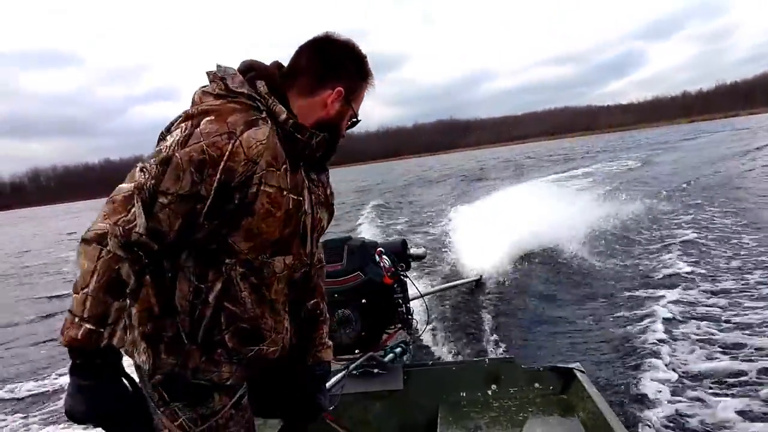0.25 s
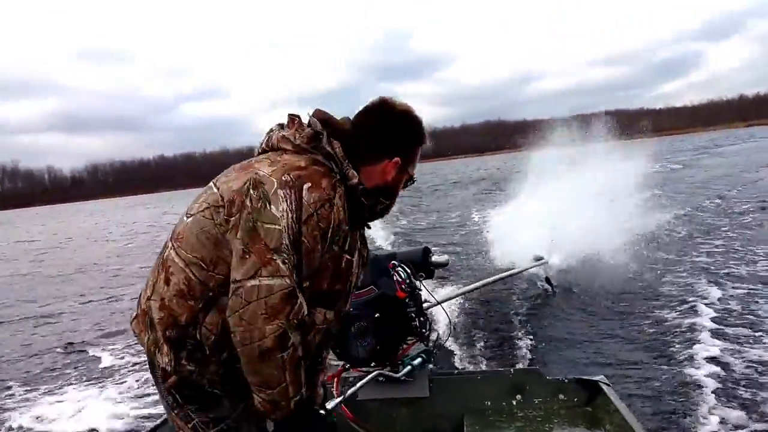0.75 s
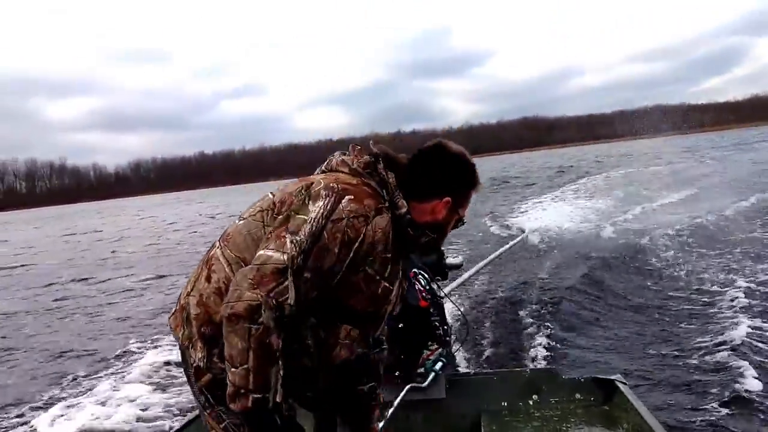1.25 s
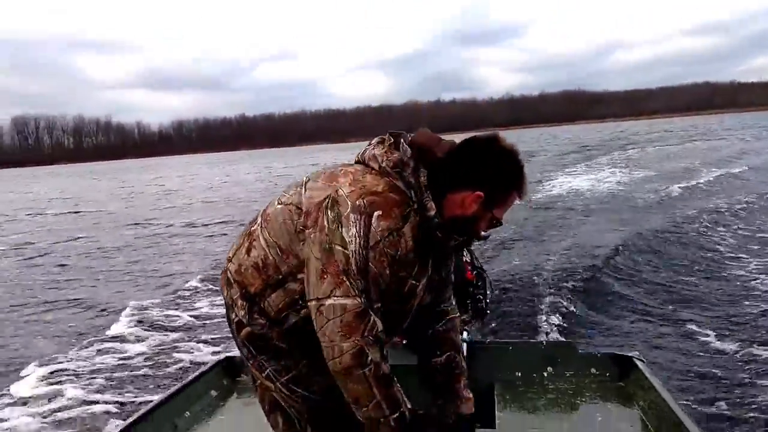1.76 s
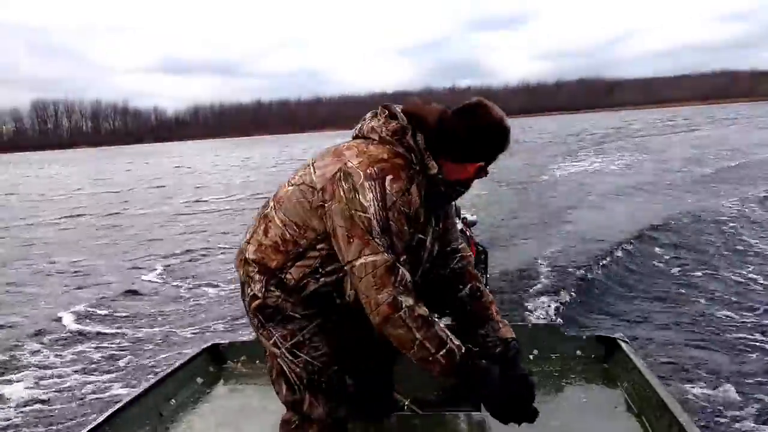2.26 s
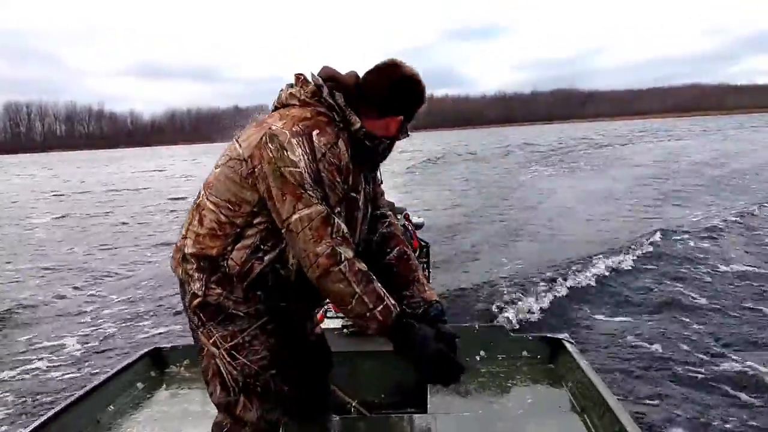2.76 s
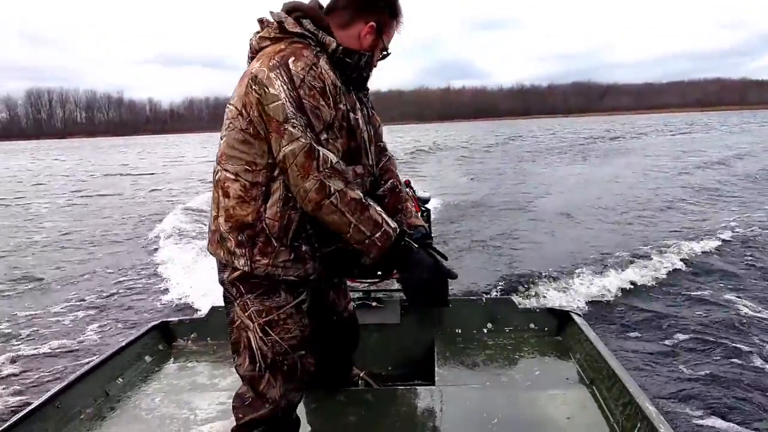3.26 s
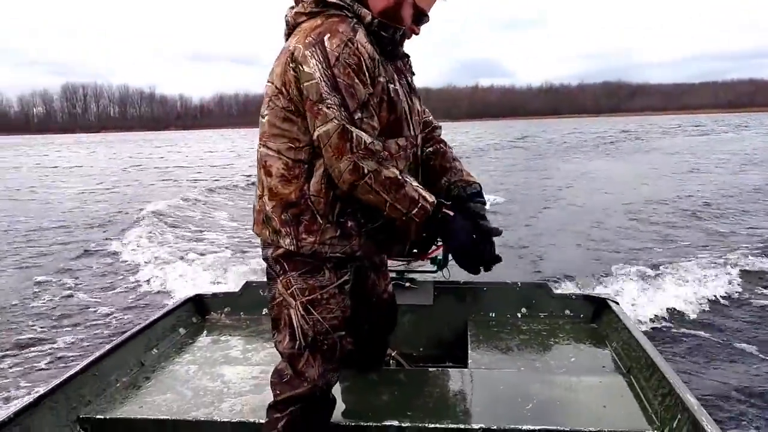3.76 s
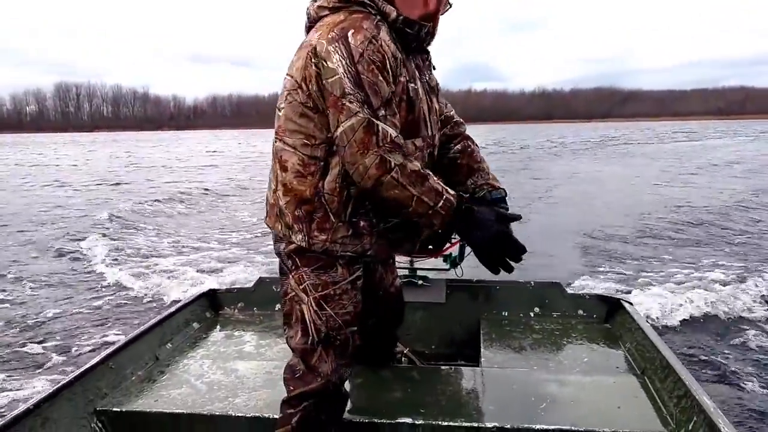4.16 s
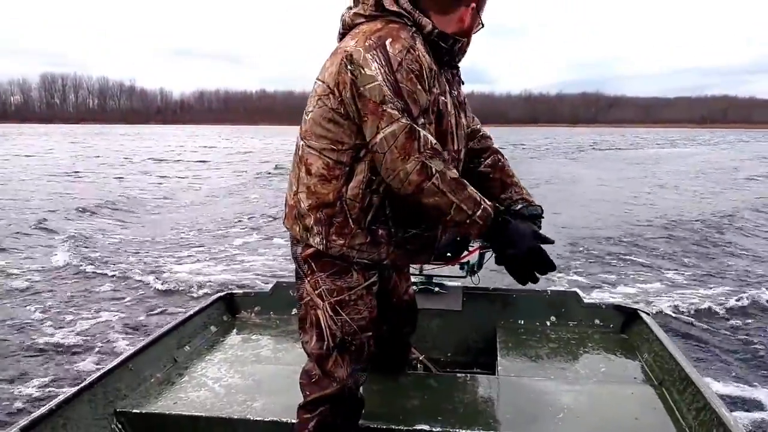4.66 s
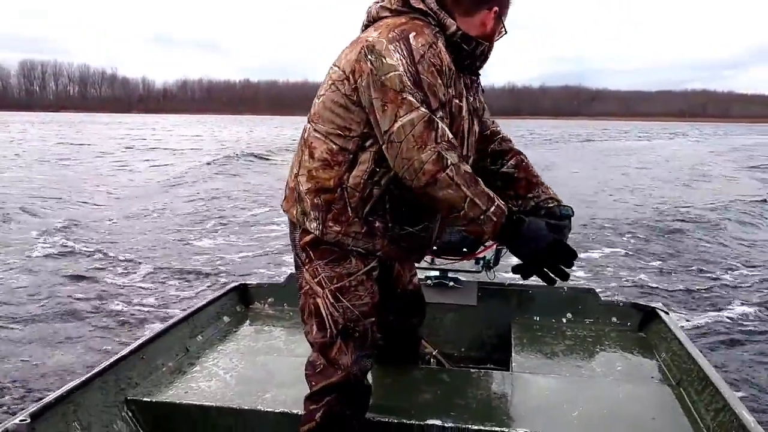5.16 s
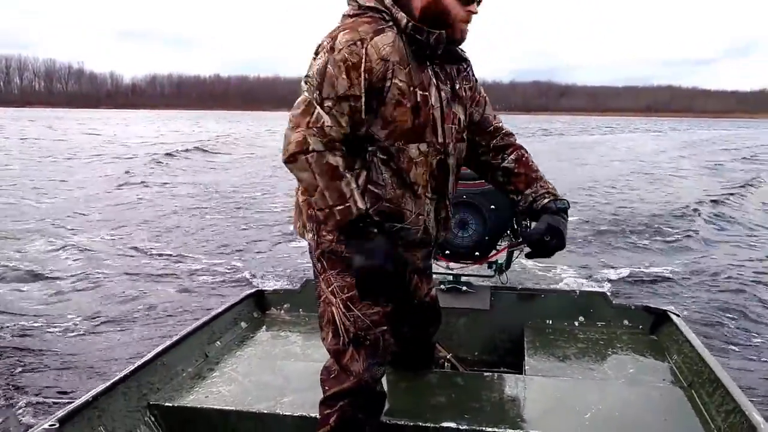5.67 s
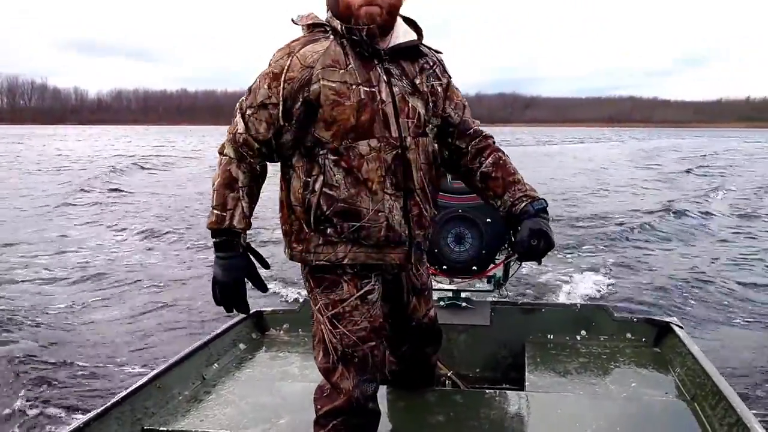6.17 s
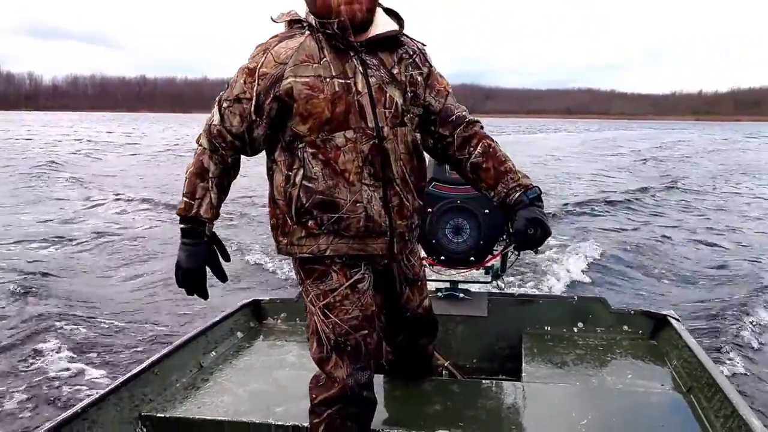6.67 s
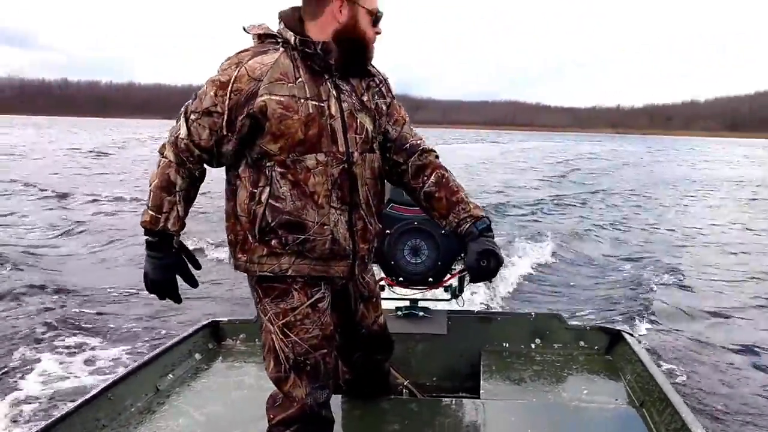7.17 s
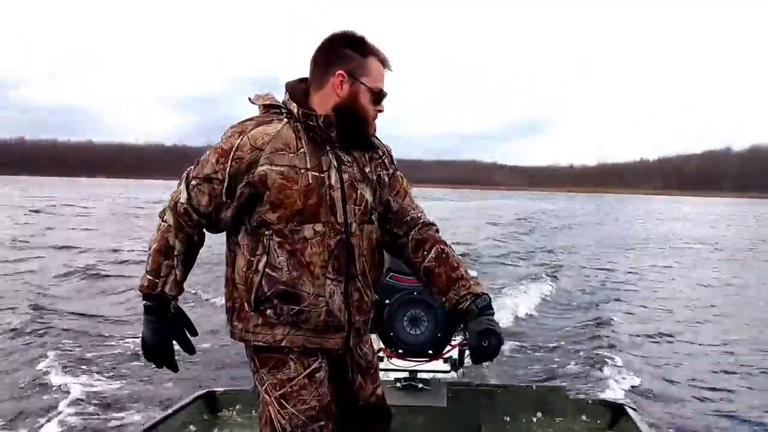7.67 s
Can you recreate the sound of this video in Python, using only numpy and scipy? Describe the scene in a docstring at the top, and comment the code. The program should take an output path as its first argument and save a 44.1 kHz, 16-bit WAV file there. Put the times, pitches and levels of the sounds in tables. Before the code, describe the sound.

A small single-cylinder boat motor roars across a lake, spins free, drops to a knocking idle amid gurgling water and wind, then picks up droning.

```python
"""A flat metal boat crosses a lake, driven by a single-cylinder, air-cooled four-stroke long-tail motor.
Under load it hums and roars over wash and waves, until the propeller lifts clear and the engine spins free.
It is throttled down to a knocking idle with gurgling water, then picks up again: fan rush and drone come forward.
Tones and kicks locked to the engine cycle make the motor; filtered noise makes gas, metal, air and water.
Gusts buffet a closely spaced, electronically widened pair of microphones."""
import sys
import numpy as np
from scipy import signal
from scipy.fft import rfft, irfft, next_fast_len
from scipy.io import wavfile
from scipy.ndimage import uniform_filter1d, map_coordinates

SR = 44100
rng = np.random.default_rng(int(sys.argv[2]) if len(sys.argv) > 2 else 0)


def persist_wave(psi):
    """Save psi, clipped to +-1, as 16-bit WAV."""
    counts = np.round(np.clip(psi, -1, 1) * 32767).astype(np.int16)
    wavfile.write(sys.argv[1], SR, np.atleast_2d(counts).T)


N = 349272
TIME = np.arange(N) / SR  # s


def from_db(db):
    """Decibels to gain."""
    return 10 ** (np.asarray(db) / 20)


def rms_one(x):
    """Scale to rms 1."""
    return x / np.sqrt(np.mean(x ** 2) + 1e-20)


def in_time(rows):
    """Read each column of a curve table at every sample; the first column is the time in seconds."""
    seconds, *columns = np.transpose(rows)
    return [np.interp(TIME, seconds, column) for column in columns]


def at_hz(points, hz):
    """Read a table on a log-frequency axis."""
    table_hz, value = np.transpose(points)
    return np.interp(np.log(hz + 1e-6), np.log(table_hz), value)


def drift(rate):
    """Smooth chance with spread 1 that changes about rate times a second."""
    step = 40  # samples between the slow random values
    r = np.exp(-2 * np.pi * step * rate / SR)
    noise = rng.standard_normal(N // step + 2002)
    slow = signal.lfilter([1], [1, -2 * r, r * r], noise)[2000:]  # skip the filter's build-up
    return np.interp(np.arange(N) / step, np.arange(len(slow)), rms_one(slow))


def spectrum_of(x):
    """Padded transform and its frequencies."""
    size = 2 * next_fast_len(N // 2 + 2000)
    return rfft(x, size), np.arange(size // 2 + 1) * SR / size


def coloured(x, spectrum):
    """Pass x through a body with this response, keeping the power of white noise."""
    bins, hz = spectrum_of(x)
    response = rms_one(from_db(at_hz(spectrum, hz)))
    return irfft(bins * response)[..., :N]


def hiss():
    """White noise, unrelated in the two channels."""
    return rng.standard_normal((2, N))


def grains(per_s, spread_db):
    """Random tiny impacts of uneven size and either sign, scaled to rms 1."""
    size_db = spread_db * np.minimum(rng.exponential(1, (2, N)), 4)
    sizes = from_db(size_db) * rng.choice([-1, 1], (2, N))
    return rms_one(sizes * (rng.random((2, N)) < per_s / SR))


def ring(x, hz, t60):
    """One decaying mode that keeps the power of white noise; t60 is its time to fall 60 dB, in seconds."""
    r = from_db(-60 / (t60 * SR))
    w = 2 * np.pi * hz / SR
    gain = np.sin(w) * np.sqrt(2 * (1 - r * r))
    return signal.lfilter([0, gain], [1, -2 * r * np.cos(w), r * r], x + 1e-18)


def wavering(hz, rate):
    """A narrow band of noise round a moving pitch; it flutters about rate times a second."""
    angle = 2 * np.pi * np.cumsum(hz) / SR
    return drift(rate) * np.cos(angle) + drift(rate) * np.sin(angle)


def orders(cycle, table, waver_db):
    """Tones locked to the engine cycle, each wavering a little in strength."""
    out = np.zeros(N)
    for multiple, level_db in table:
        turn = (round(multiple) * cycle + rng.random()) % 1
        gain = from_db(level_db + waver_db * drift(4.5))
        out += gain * np.sin((2 * np.pi * turn).astype(np.float32))
    return np.sqrt(2) * out


def strokes(cycle, decay_s, uneven_db, jitter):
    """Every contact of every engine cycle gives a kick that dies away; the running mean power is held near 1."""
    # Contacts in each engine cycle, two hard and two light.
    # Each row: share of the cycle, relative level in dB.
    contacts = [(.16, 0), (.43, -6), (.63, 0), (.9, -12)]
    kicks = np.zeros(N)
    cycles = np.arange(int(cycle[-1]))
    for share, level_db in contacts:
        slip, size = rng.standard_normal((len(cycles), 2)).T
        at = np.searchsorted(cycle, cycles + share + jitter * slip)
        kicks[np.minimum(at, N - 1)] = from_db(level_db + uneven_db * np.clip(size, -2, 2))
    r = np.exp(-1 / (decay_s * SR))
    swell = signal.lfilter([1], [1, -2 * r, r * r], kicks + 1e-18)
    return swell / np.sqrt(uniform_filter1d(swell ** 2, size=SR // 4) + 1e-9)


def engine_tones(cycle, firing_rate, load_db):
    """The block hums and the muffler drones; the hull booms under load, the shaft whines when fast and free."""
    # Hum of the block. Each row: time in seconds, dB for the tones round 4 x the firing rate
    # before their own balance, dB at 6 x.
    hum_curve = [(0, -32.5, -30.5), (.92, -38, -30), (1.05, -38, -51), (1.8, -38, -44), (2.28, -28.5, -41),
                 (2.6, -31.5, -43), (3.3, -41, -40), (5.2, -43, -36.5), (6.4, -32.5, -38.5),
                 (7.05, -32.5, -43), (7.35, -47, -48)]
    # The muffler's drone grows as the motor is swung round.
    # Each row: time in seconds, dB added to all the muffler tones.
    drone_curve = [(0, -61), (3.5, -59), (6.0, -42.5), (6.75, -40.5), (7.1, -35), (7.75, -35), (7.92, -38)]
    # Muffler note. Each row: multiple of the firing rate, relative level in dB.
    drone_orders = [(3, -2.5), (5, -5), (6, -4.5), (7, -5), (8, -6), (10, 1.5), (11, -4.5), (14, -6),
                    (16, -5), (33, -7), (36, -8)]
    # Orders that the hull radiates. Each row: multiple of the firing rate, relative level in dB.
    boom_orders = [(23, -7), (27, -10)]
    # The shaft whines at harmonics of twice the crank rate.
    # Each row: multiple of the firing rate, relative level in dB.
    whine_orders = [(8, 1.5), (12, -3), (16, -3.5), (20, -4), (24, -2), (28, -3), (32, 0), (36, 1.5),
                    (40, 1), (44, -4.5), (48, -2), (52, 0), (56, 2), (60, -3.5)]
    boom_full_load_db, boom_follows = -36.5, 1.7  # dB added to its orders; dB per dB of load
    whine_full_load_db, whine_damped = -49.5, 0.53  # dB added at speed; dB lost per dB of load
    whine_rate, whine_db_per_rate = 23.1, 7.0  # below this firing rate it fades, dB per firing per s

    fourth_db, sixth_db = in_time(hum_curve)
    drone_db, = in_time(drone_curve)
    too_slow = np.maximum(whine_rate - firing_rate, 0)
    whine_db = whine_full_load_db - whine_db_per_rate * too_slow - whine_damped * load_db
    boom_db = boom_full_load_db + boom_follows * load_db
    hum = from_db(fourth_db) * orders(cycle, [(3, -10.0), (4, 2.0), (5, -6.5)], waver_db=3.0)
    hum += from_db(sixth_db) * orders(cycle, [(6, 0)], waver_db=3.5)
    drone = from_db(drone_db) * orders(cycle, drone_orders, waver_db=2.2)
    boom = from_db(boom_db) * orders(cycle, boom_orders, waver_db=4.0)
    whine = from_db(whine_db) * orders(cycle, whine_orders, waver_db=1.1)
    return hum + drone + boom + whine


def exhaust(cycle, gain):
    """A puff of turbulent gas on each stroke, over a steady rush."""
    # Colour of the gas. Each row: frequency in Hz, relative level in dB per Hz.
    roar_spectrum = [(120, -24), (220, -10), (310, -3.5), (420, -8), (560, 0), (750, -4.5), (1000, -7.5),
                     (1450, -6), (2000, -10.5), (2700, -13.5), (4000, -16), (8000, -55), (15000, -48)]
    puffs = strokes(cycle, decay_s=.003, uneven_db=2.0, jitter=.008)
    rush = 0.62 * hiss()
    puffing = 0.4 * puffs * grains(6000, spread_db=2.0)
    return gain * coloured(rush + puffing, roar_spectrum)


def metalwork(cycle, gain, pickup):
    """Valve gear and sheet metal rattle at each contact, the shaft knocks; blows stir the metal's ringing modes."""
    # The drive shaft knocks in its mount. Each row: start in seconds, level in dB.
    knock_times = [(1.89, -18), (2.3566, -24), (2.463, -16), (2.5337, -24), (2.58, -21), (2.603, -16.5),
                   (2.727, -13), (2.7522, -17), (2.776, -15.5), (2.805, -13.5), (2.831, -17), (2.895, -13),
                   (2.95, -21), (2.965, -20), (3.148, -26), (4.483, -16.5), (4.5436, -26), (4.592, -19.5),
                   (4.687, -13), (4.745, -19), (4.8688, -27.5), (4.938, -17), (4.96, -25), (5.0114, -23),
                   (5.037, -26), (5.0747, -14), (5.0988, -18), (5.139, -18), (5.163, -27), (5.201, -18),
                   (5.218, -17.5), (5.256, -18.5), (5.28, -24), (5.343, -15), (5.364, -14), (5.3976, -16.5),
                   (5.419, -14), (5.45, -21), (5.475, -16.5), (5.501, -13), (5.541, -21), (5.613, -16.5),
                   (5.64, -16.5), (5.6695, -15.5), (5.698, -20), (5.797, -20), (5.91, -14), (6.229, -13.5),
                   (6.317, -14), (6.447, -13.5)]
    # A loose fitting pings. Each row: start in seconds, peak level in dB.
    ping_times = [(4.897, -28), (5.097, -21.5)]
    # Ringing of the engine shroud and mount.
    # Each row: frequency in Hz, relative level in dB, time to fall 60 dB in seconds.
    metal_modes = [(3050, -9, .0086), (3460, -1, .022), (5900, 0.5, .015), (6420, 1.5, .009),
                   (7500, 0, .018)]
    # Colour of the rattle. Each row: frequency in Hz, relative level in dB per Hz.
    clatter_spectrum = [(1000, 2.5), (1900, -45), (2600, 7), (3400, -2), (4400, 5.5), (6000, 4.5),
                        (7600, 3), (9500, -1.5), (12500, -9.5), (15000, -11)]
    # Colour of the shaft knocks. Each row: frequency in Hz, relative level in dB per Hz.
    knock_spectrum = [(150, -5), (500, 14), (900, 5), (2000, 6.5), (3300, 2.5), (4500, 5.5), (6000, 8.5),
                      (8000, 6), (10500, -3), (15000, -14)]
    attack_s, decay_s = 0.0009, 0.0068  # of a knock
    ping_hz, ping_t60 = 5930, .12  # Hz; s to fall 60 dB
    lug_db_per_accel = 0.27  # strokes gain this and the hiss loses it, dB per (firings per s per s)

    shaken = strokes(cycle, decay_s=.0021, uneven_db=1.2, jitter=.01)
    grit = grains(8000, spread_db=2.0)
    jolts = from_db(1.25 * drift(14))
    lug = from_db(lug_db_per_accel * pickup)
    rattle = gain * jolts * (0.59 / lug * hiss() + 0.42 * lug * shaken * grit)

    blows, pings = np.zeros((2, N))
    for start_s, level_db in knock_times:
        age = np.clip(TIME - start_s, 0, .2)
        blows += from_db(level_db) * (1 - np.exp(-age / attack_s)) * np.exp(-age / decay_s)
    for start_s, peak_db in ping_times:
        age = np.maximum(TIME - start_s, 0)
        pings += from_db(peak_db - 60 * age / ping_t60) * np.sin(2 * np.pi * ping_hz * age)
    knocks = blows * grains(8000, spread_db=1.0)

    force = np.hypot(gain * jolts * shaken, blows)
    ringing = np.zeros((2, N))
    for hz, level_db, t60 in metal_modes:
        share = from_db(level_db + 3.0 * drift(5.2))  # the mix of modes keeps changing
        ringing += ring(share * force * hiss(), hz, t60)
    body = coloured(rattle, clatter_spectrum) + coloured(knocks, knock_spectrum)
    return body + from_db(-17.5) * ringing + pings


def hollow(cycle, firing_rate):
    """A gliding hollow resonance picks out engine orders passing through it; short gurgles swell and rise in pitch."""
    # The resonance under the stern rises as the propeller nears the surface.
    # Each row: time in seconds, frequency in Hz, level in dB.
    resonance_curve = [(0, 300, -39), (.45, 305, -42), (.6, 313, -27), (.75, 325, -41), (.93, 340, -34.5),
                       (1.1, 412, -41), (1.4, 410, -57), (4.5, 300, -59), (6.2, 300, -34.5),
                       (6.6, 300, -39), (6.9, 315, -32.5), (7.4, 296, -37), (7.75, 320, -29.5)]
    # Water gurgles at the stern as the boat slows.
    # Each row: loudest moment in seconds, pitch there in Hz, level in dB.
    gurgle_times = [(3.779, 430, -30.5), (3.859, 367, -32), (3.9, 494, -33.5), (4.22, 225, -31.5),
                    (4.871, 205, -27.5), (4.979, 290.6, -32.5), (5.15, 198.7, -27.5)]
    width_hz, noise_db = 14.7, -6.5  # how near an order must pass; noise in the resonance, relative dB
    swell_s, octaves_per_s = 0.066, 1.1  # of a gurgle

    hz, level_db = in_time(resonance_curve)
    picked = np.zeros(N)
    for k in range(11, 18):
        nearness = np.exp(-((k * firing_rate - hz) / width_hz) ** 2)
        picked += nearness * orders(cycle, [(k, 0)], waver_db=0.5)
    out = from_db(level_db) * (picked + from_db(noise_db) * wavering(hz, rate=8.9))
    for loudest_s, pitch_hz, gurgle_db in gurgle_times:
        age = np.clip(TIME - loudest_s, -1, 1)
        swell = np.exp(-(age / swell_s) ** 2)
        rising_hz = pitch_hz * 2 ** (octaves_per_s * age)
        out += from_db(gurgle_db) * swell * wavering(rising_hz, rate=45)
    return out


def water(gain):
    """Lumpy wash under the hull, with bubbles that ring for a few cycles."""
    # Colour of the wash. Each row: frequency in Hz, relative level in dB per Hz.
    wash_spectrum = [(100, -4), (210, -6.5), (300, -2.5), (440, -1), (700, -3), (1200, -9), (3000, -15),
                     (7000, -22.5), (15000, -34.5)]
    churn = from_db(2.2 * drift(25))
    pops = grains(900, spread_db=1.0) * churn
    dealt = rng.integers(0, 12, N)  # which of 12 bubble sizes pops at each moment
    bubbles = np.zeros((2, N))
    for k, hz in enumerate(np.geomspace(230, 800, 12)):
        bubbles += ring(pops * (dealt == k), hz, 11 / hz)
    return gain * rms_one(coloured(hiss() * churn, wash_spectrum) + 0.37 * bubbles)


def wind():
    """Eddies thump on the microphone ports: a light breeze, and gusts that strike, hold and die away."""
    # The light breeze. Each row: time in seconds, level in dB.
    breeze_curve = [(1.3, -43), (2.6, -37)]
    # Gusts. Each row: start in seconds, length before the release in seconds, level in dB.
    gust_times = [(1.484, 0.048, -28), (1.678, 0.02, -37), (2.148, 0.25, -38), (2.62, 0.19, -32),
                  (3.233, .06, -31.5), (3.356, 0.042, -26), (3.562, 0.057, -23.5), (3.723, .07, -29),
                  (4.164, 0.2, -28.5), (4.438, 0.039, -25.5), (4.63, 0.06, -30), (4.835, .46, -28),
                  (6.337, .12, -33), (6.594, 0.19, -37)]
    # Colour of the thumping. Each row: frequency in Hz, relative level in dB per Hz.
    wind_spectrum = [(25, -17), (45, 0), (70, -1.5), (120, 2.5), (200, -3.5), (350, -9), (800, -42),
                     (2000, -43)]
    attack_s, release_s = 0.01, 0.12

    power = from_db(in_time(breeze_curve)[0]) ** 2
    for start_s, length_s, gust_db in gust_times:
        age = np.clip(TIME - start_s, 0, 1)
        shape = (1 - np.exp(-age / attack_s)) * np.exp(-np.maximum(age - length_s, 0) / release_s)
        power = power + (from_db(gust_db) * shape) ** 2
    eddies = coloured(hiss() * from_db(0.42 * drift(3.3)), wind_spectrum)
    return np.sqrt(power) * rms_one(eddies)


def waves():
    """Each wave swells to its crest and falls away faster: gains of the wash and of the rattle."""
    # Waves meet the hull, wash along it and shake its metal.
    # Each row: crest in seconds, rise in seconds, wash level in dB, rattle level in dB.
    wave_times = [(.25, 0.17, -27.5, -28.5), (.6, 0.12, -26, -42), (1.68, 0.13, -32, -22.5),
                  (2.201, 0.13, -26, -26.5), (2.5, 0.11, -21, -25), (2.88, 0.34, -26.5, -29.5),
                  (3.85, 0.51, -27.5, -56), (4.25, 0.089, -23, -35), (4.49, 0.014, -17.5, -50),
                  (4.96, 0.053, -22.5, -48), (5.29, 0.26, -21, -43), (6.12, 0.27, -23, -45),
                  (7.76, 0.088, -25, -43)]
    fall_share = 0.48  # fall time over rise time
    wash, rattle = np.zeros((2, N))  # powers
    for crest_s, rise_s, wash_db, rattle_db in wave_times:
        age = TIME - crest_s
        swell = np.exp(-(age / np.where(age < 0, rise_s, fall_share * rise_s)) ** 2)
        wash += swell * from_db(wash_db) ** 2
        rattle += swell * from_db(rattle_db) ** 2
    return np.sqrt(wash), np.sqrt(rattle)


def fan():
    """Air rushes through the flywheel's cooling fan."""
    # The fan comes out from behind the helmsman. Each row: time in seconds, level in dB.
    fan_curve = [(5.4, -72), (6.05, -28.5), (7.78, -26.5), (7.92, -50)]
    # Colour of the rush. Each row: frequency in Hz, relative level in dB per Hz.
    fan_spectrum = [(400, -22), (780, 2), (1050, -33), (1400, 7.5), (1600, 1), (1790, 12.5), (2100, -10),
                    (2650, 6.5), (3300, -49), (8000, -38), (14500, -24)]
    fan_db, = in_time(fan_curve)
    return from_db(fan_db) * coloured(hiss(), fan_spectrum)


def scene():
    """Engine speed times every engine sound and load sets its strength; waves and wind come on top."""
    # Engine speed. Each row: time in seconds, firings per second.
    speed_curve = [(0.0, 24.39), (0.32, 23.29), (0.55, 24.17), (0.92, 23.76), (1.02, 26.01), (2.0, 24.43),
                   (2.45, 22.49), (3.1, 17.91), (4.58, 11.23), (5.25, 17.54), (5.55, 18.4), (5.8, 20.35),
                   (6.1, 22.28), (6.55, 23.29), (6.75, 24.6), (7.1, 23.48), (7.35, 22.78), (7.65, 22.93),
                   (7.92, 21.96)]
    # Load on the engine, which drops as the propeller lifts clear.
    # Each row: time in seconds, load in dB relative to full load.
    load_curve = [(0, -1), (.96, 1), (1.02, -10), (1.45, -7.5), (2.0, -11), (3.1, -15), (3.6, -11),
                  (4.0, -17.5), (4.75, -16.5), (5.1, -9.5), (5.6, -6.5), (6.08, -0.5), (7.78, 1.8),
                  (7.92, -2)]
    roar_full_load_db, roar_follows = -21, 0.4  # dB; dB per dB of load
    clatter_full_load_db = -22.5
    wave_roar_db = 2.5  # a wave also loads the propeller: added roar against its rattle
    # between waves; the stern settles and churns as the engine slows
    cruise_rate, wash_db, wash_db_per_rate = 24, -32, -0.43  # firings per s; dB; dB per firing per s

    firing_rate, = in_time(speed_curve)
    load_db, = in_time(load_curve)
    cycle = np.cumsum(firing_rate * (1 + 0.0008 * drift(6.0))) / SR  # engine cycles so far
    acceleration = uniform_filter1d(np.gradient(firing_rate) * SR, size=SR // 2)
    pickup = np.maximum(acceleration, 0)
    wave_wash, wave_rattle = waves()

    roar_gain = from_db(roar_full_load_db + roar_follows * load_db)
    roar_gain = np.hypot(roar_gain, from_db(wave_roar_db) * wave_rattle)
    clatter_gain = np.hypot(from_db(clatter_full_load_db + load_db), wave_rattle)
    stern_gain = from_db(wash_db + wash_db_per_rate * (firing_rate - cruise_rate))
    wash_gain = np.hypot(stern_gain, wave_wash)
    motor = engine_tones(cycle, firing_rate, load_db)
    motor = motor + exhaust(cycle, roar_gain) + metalwork(cycle, clatter_gain, pickup)
    return motor + fan() + hollow(cycle, firing_rate) + water(wash_gain) + wind()


def record(dry):
    """The close microphones hear nearly the same; each has a delayed copy of the other subtracted to widen the image."""
    # The hollow notch sinks a little; the cross-feed is delayed by one period of it.
    # Each row: time in seconds, notch frequency in Hz.
    notch_curve = [(0, 2310), (5.6, 2290), (7.2, 2260)]
    # Cross-feed. Each row: frequency in Hz, level in dB.
    feed_curve = [(100, -.2), (1100, -.5), (1500, -.03), (2800, -.03), (3400, -3), (4600, -7), (7000, -8.5),
                  (9400, -13), (15000, -17)]
    # Stereo width. Each row: frequency in Hz, side minus mid in dB.
    width_curve = [(40, -4.5), (100, -11.5), (300, -10.5), (600, -10.5), (1200, -4.5), (2000, 2.5),
                   (3300, 1.5), (7000, -1), (15000, -0.5)]
    # Channel balance. Each row: frequency in Hz, left minus right in dB.
    balance_curve = [(60, 0.8), (150, 1.3), (330, 3.5), (650, 3.8), (1200, -0.7), (1850, 2.5), (2050, 0),
                     (2500, 0), (2700, -3), (3500, -2), (4600, -3), (6500, -5), (9000, 0), (14500, -3.5)]
    # Phase between the channels. Each row: frequency in Hz, radians by which the left lags.
    lag_curve = [(2600, 0), (3450, .15), (5750, .7), (8000, .9), (10400, 1.4), (13000, 2.7)]
    cutoff_hz = 15500

    notch_hz, = in_time(notch_curve)
    pair = np.array([dry[0] + dry[1], dry[0] - dry[1]])  # mid, side
    late_at = np.arange(N) - SR / notch_hz
    late = np.array([map_coordinates(x, [late_at], order=3) for x in pair])
    (mid, side), hz = spectrum_of(pair)
    (late_mid, late_side), _ = spectrum_of(late)
    feed = from_db(at_hz(feed_curve, hz))
    width = from_db(at_hz(width_curve, hz))
    # even out the power that the subtraction and the width would change
    comb = feed * np.exp(-2j * np.pi * hz / notch_hz.mean())
    power = np.sqrt(2 * (abs(1 - comb) ** 2 + abs(width * (1 + comb)) ** 2))
    sign = np.array([[1], [-1]])  # left, right
    wide = (mid - feed * late_mid + sign * width * (side + feed * late_side)) / power
    balance = from_db(sign * at_hz(balance_curve, hz) / 2)
    lag = np.exp(-.5j * sign * at_hz(lag_curve, hz))
    out = irfft(wide * balance * lag)[:, :N]
    lowpass = signal.ellip(10, .2, 80, cutoff_hz, fs=SR, output="sos")
    return signal.sosfilt(lowpass, out)


dry = scene()
out = record(dry)
persist_wave(out)
```